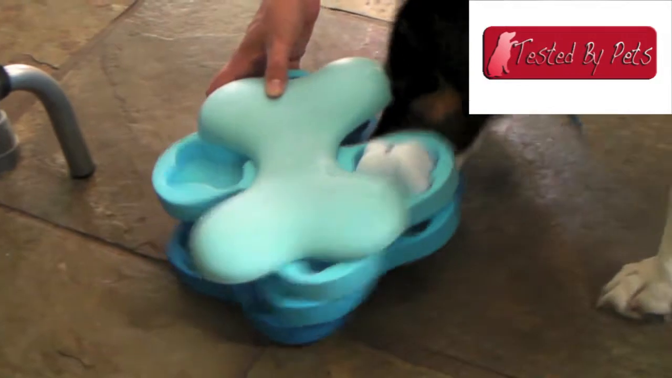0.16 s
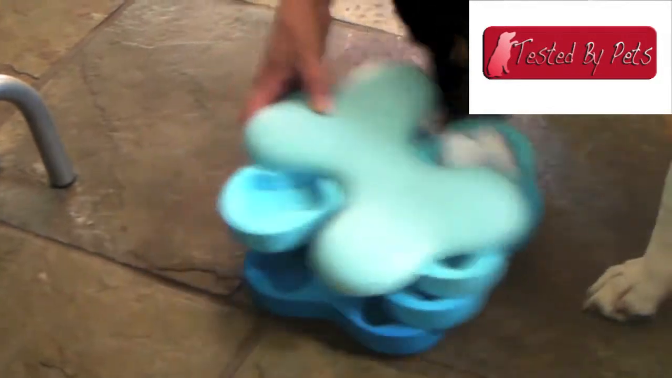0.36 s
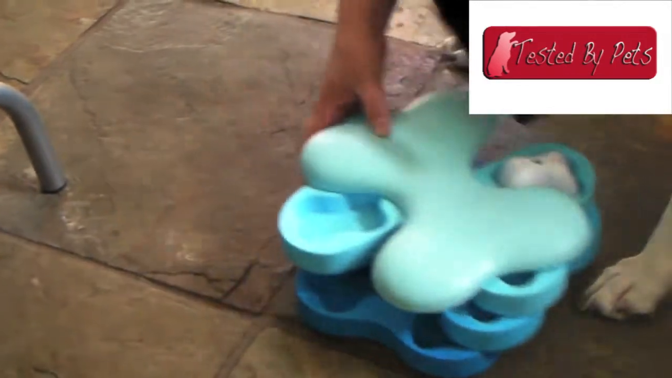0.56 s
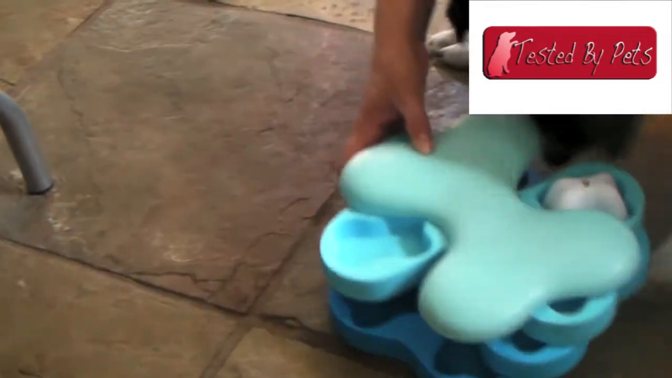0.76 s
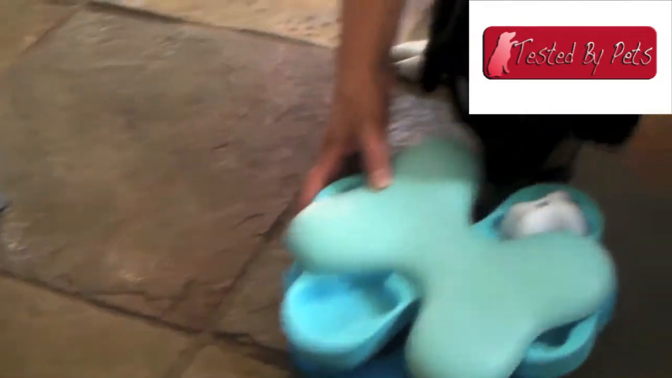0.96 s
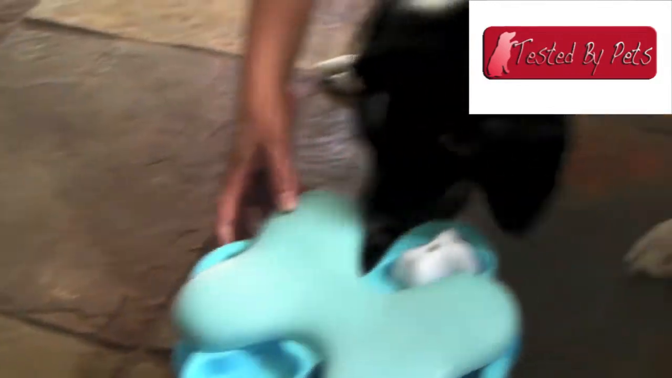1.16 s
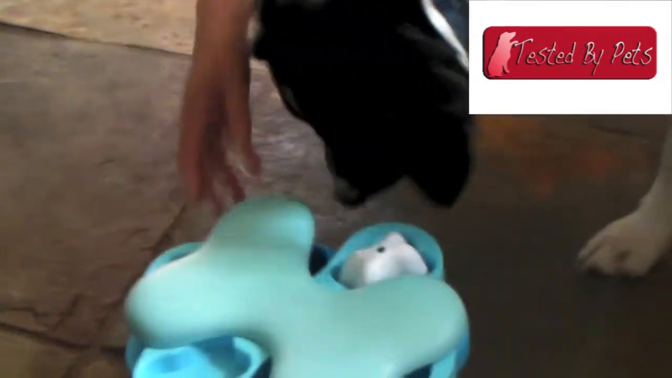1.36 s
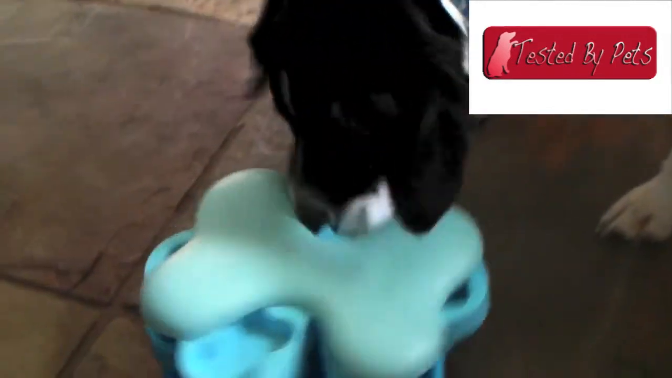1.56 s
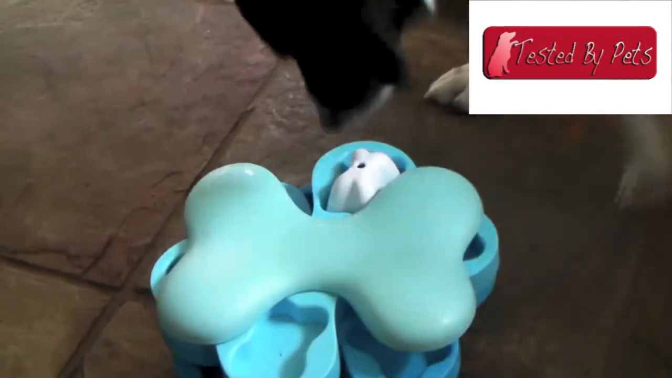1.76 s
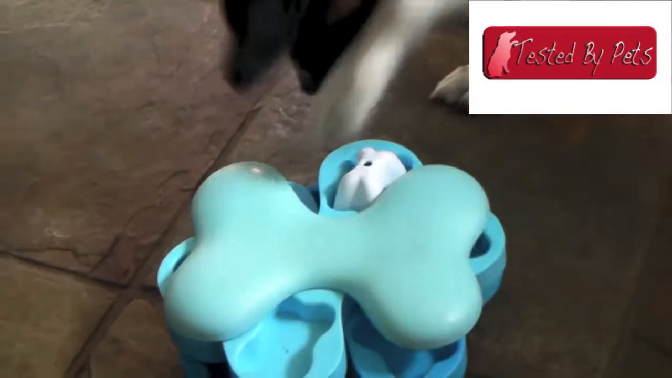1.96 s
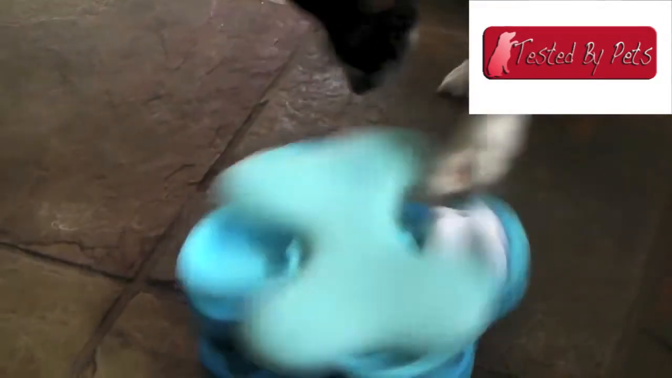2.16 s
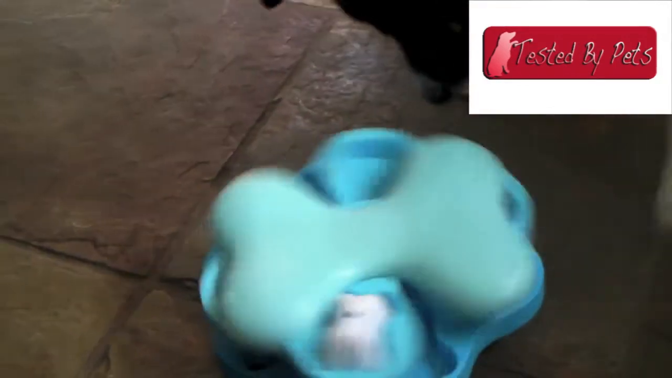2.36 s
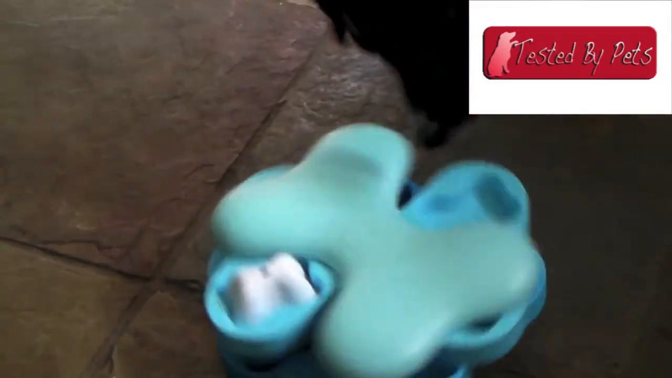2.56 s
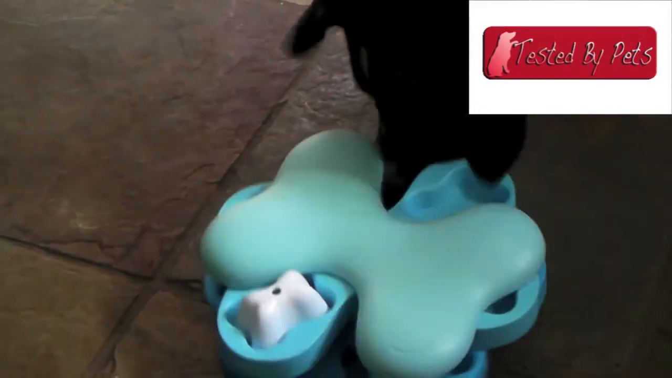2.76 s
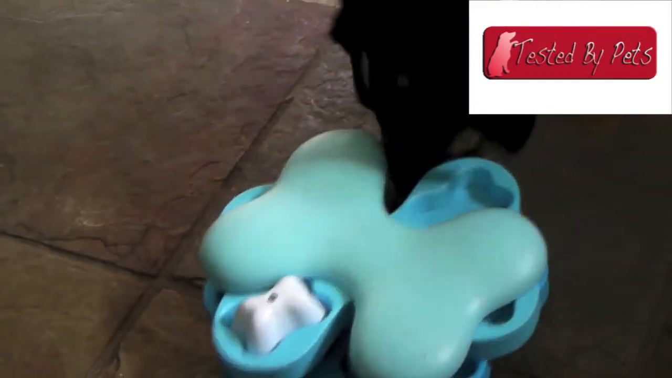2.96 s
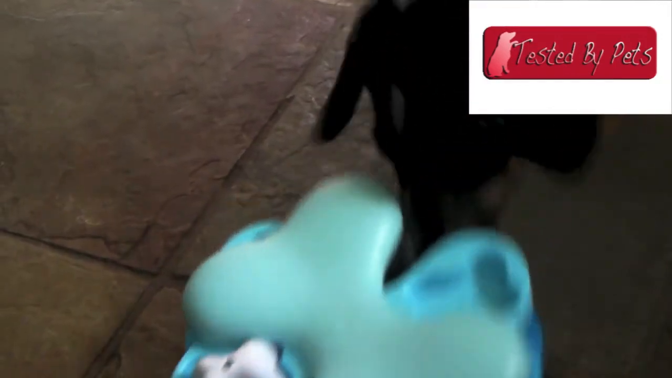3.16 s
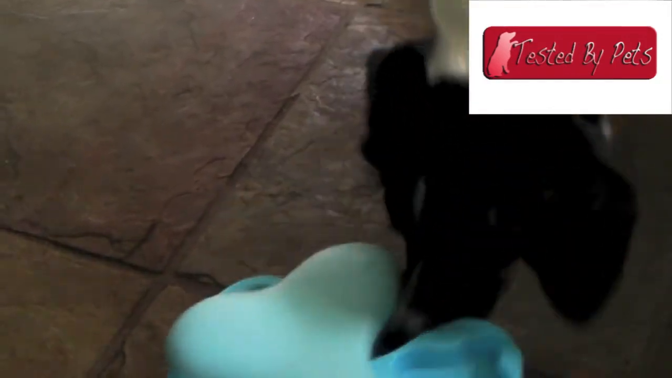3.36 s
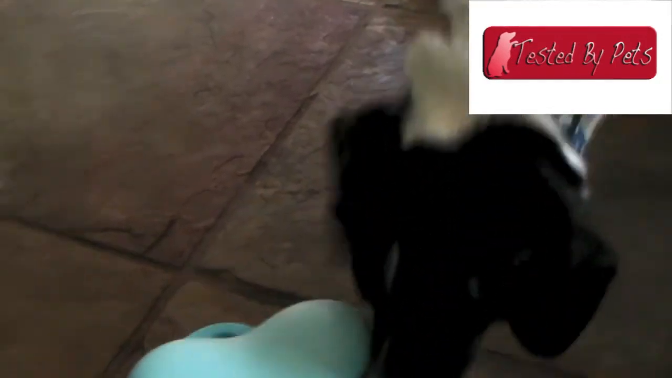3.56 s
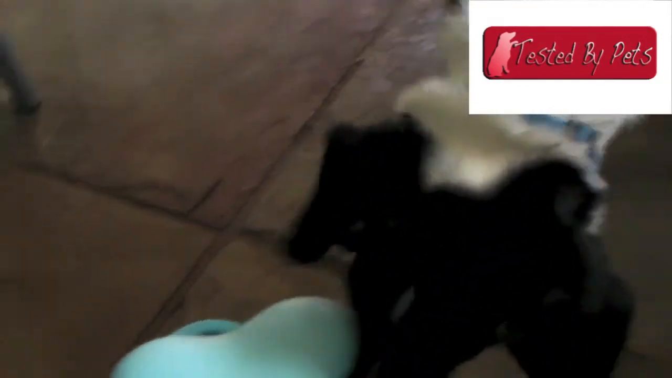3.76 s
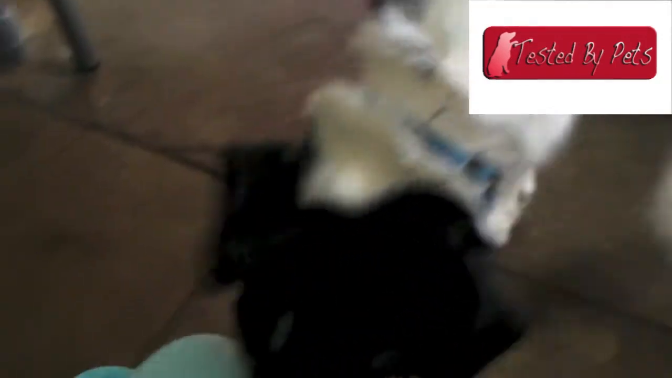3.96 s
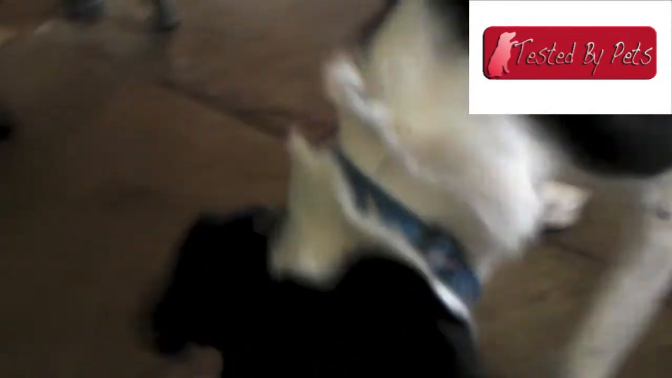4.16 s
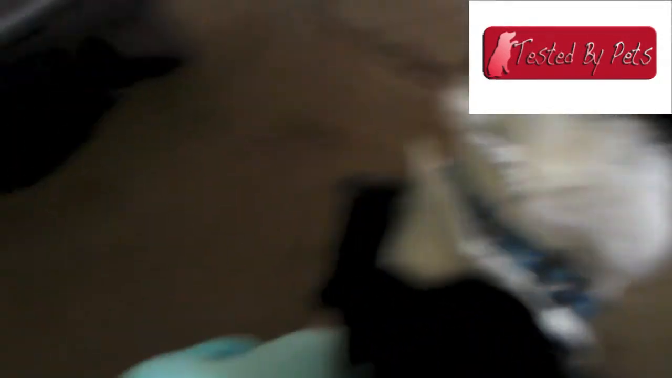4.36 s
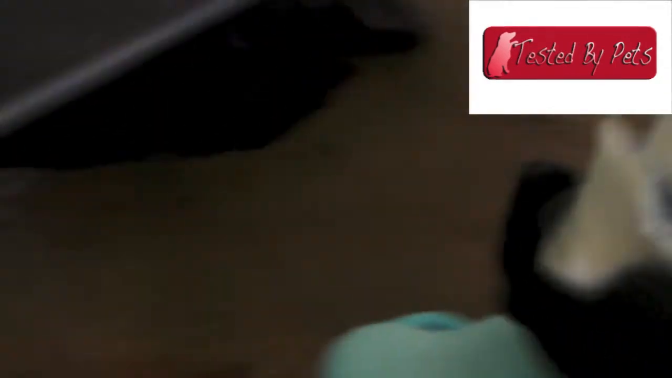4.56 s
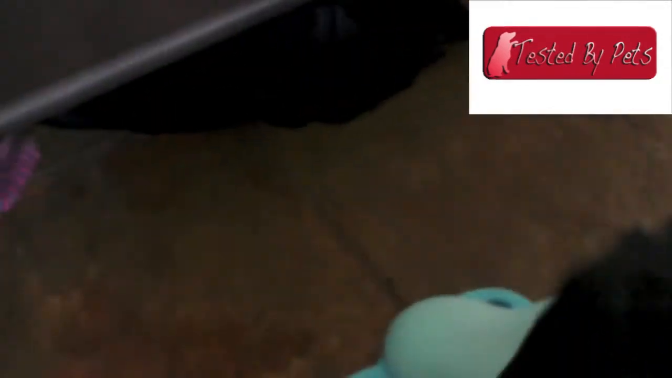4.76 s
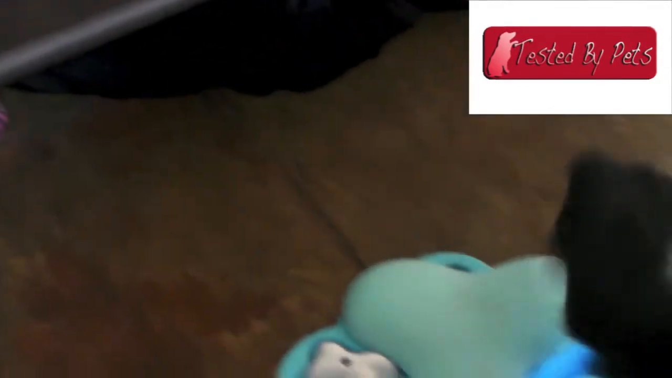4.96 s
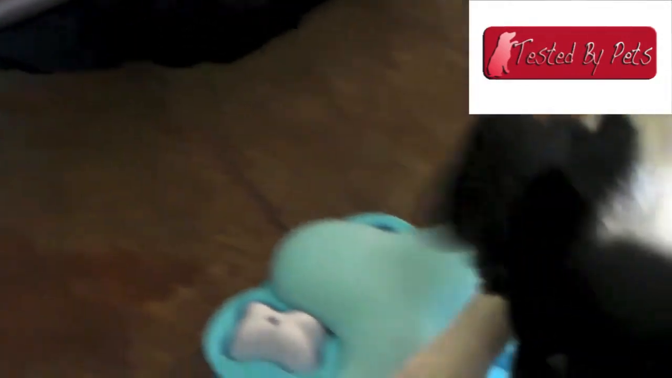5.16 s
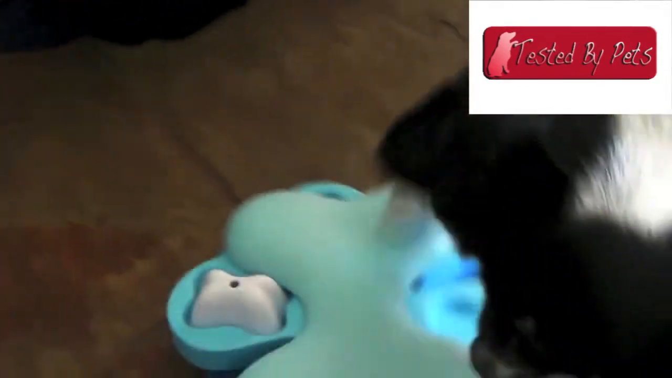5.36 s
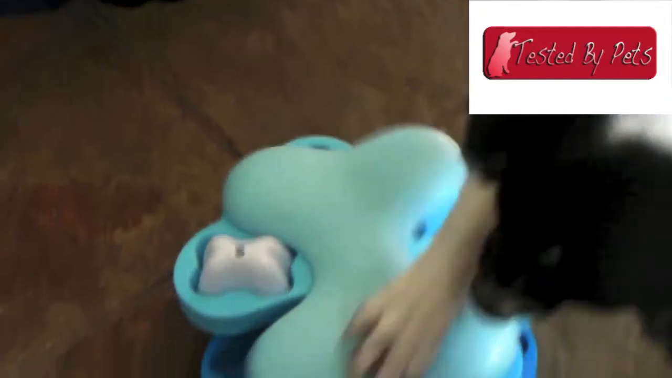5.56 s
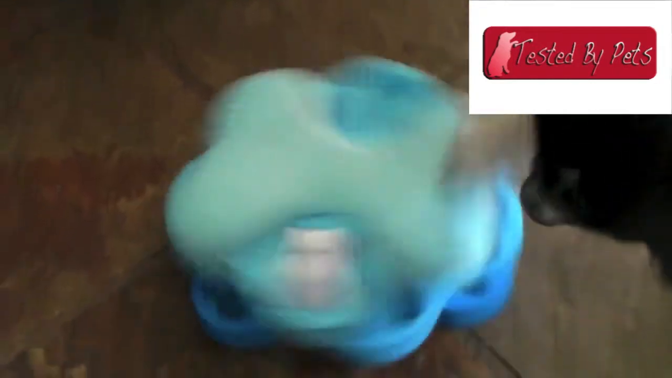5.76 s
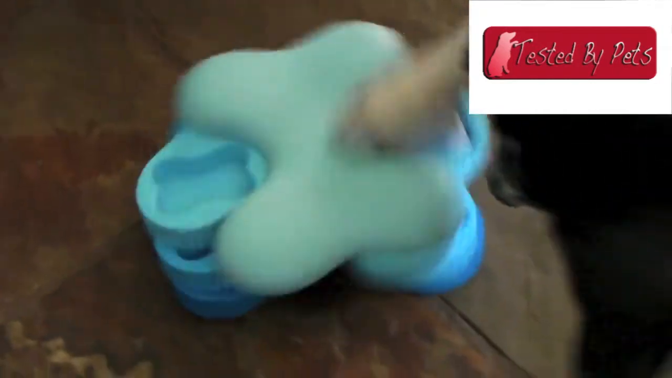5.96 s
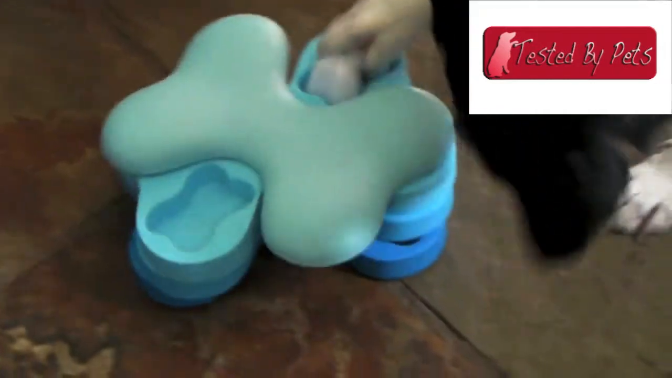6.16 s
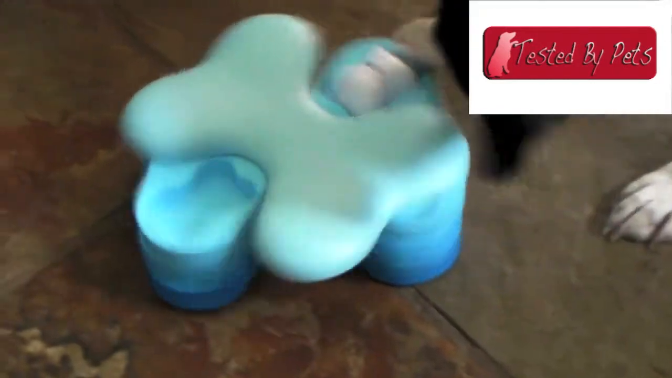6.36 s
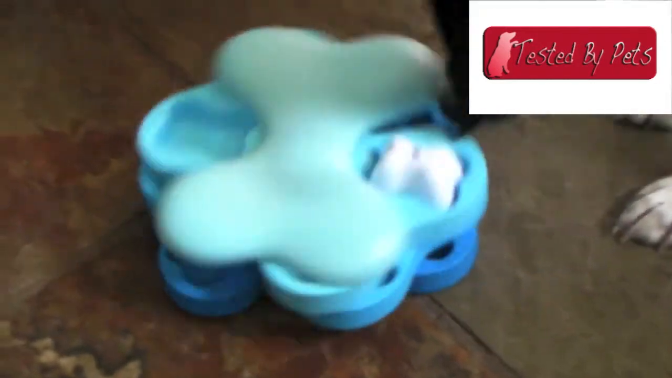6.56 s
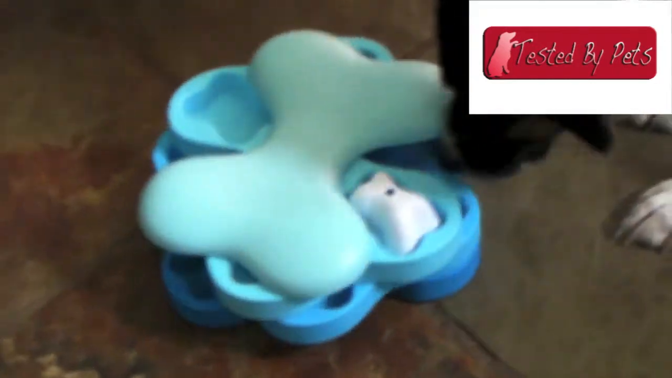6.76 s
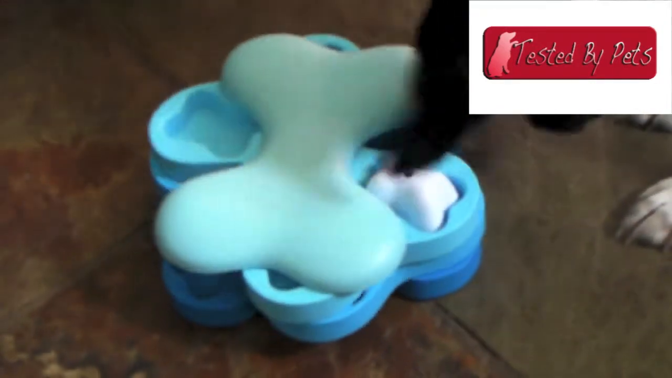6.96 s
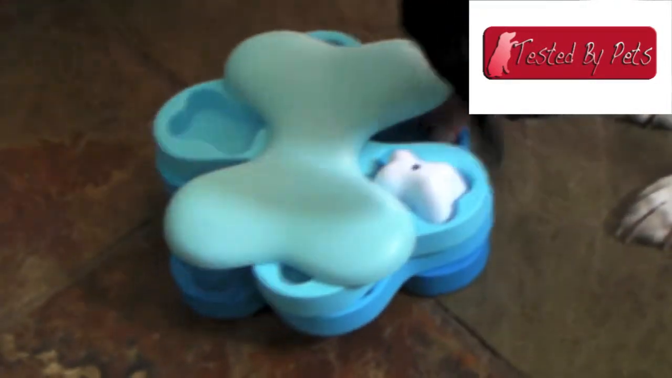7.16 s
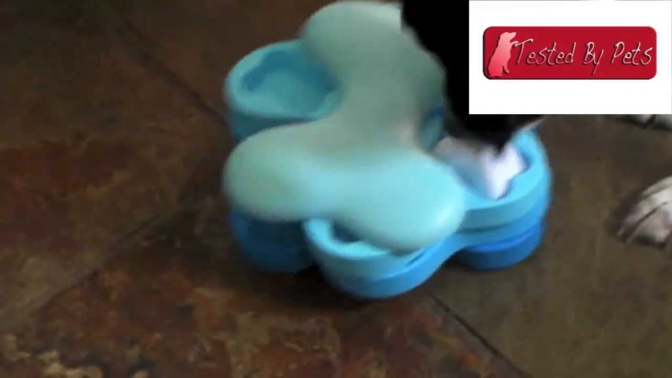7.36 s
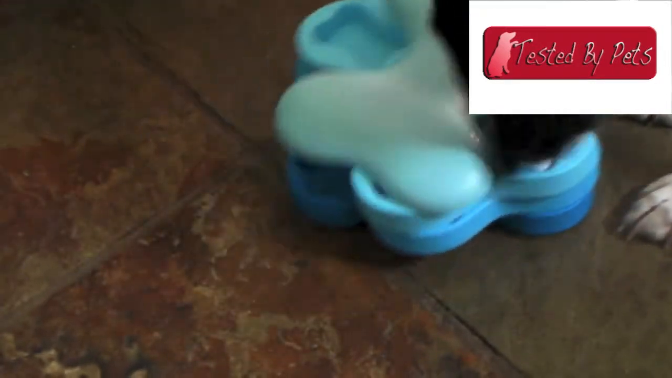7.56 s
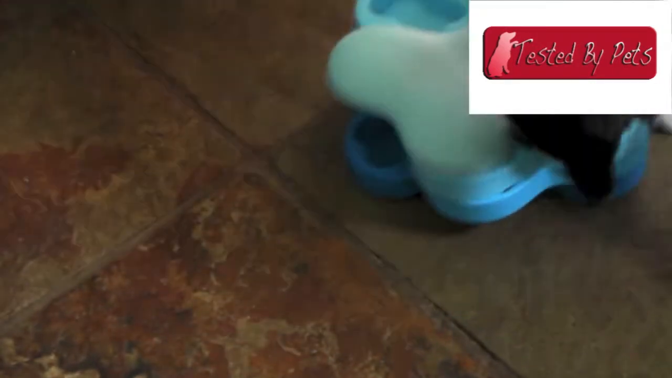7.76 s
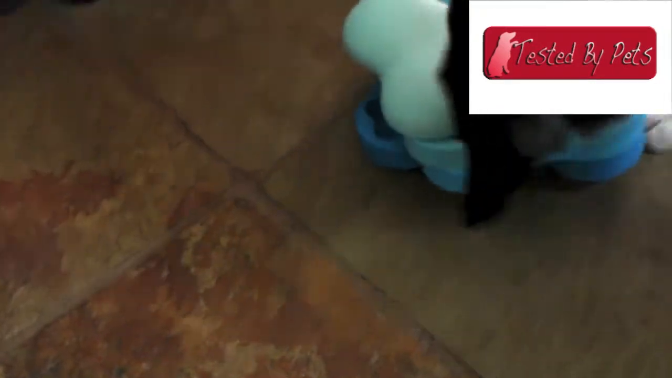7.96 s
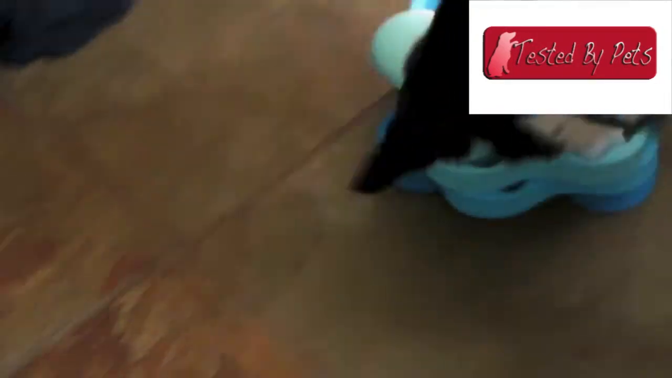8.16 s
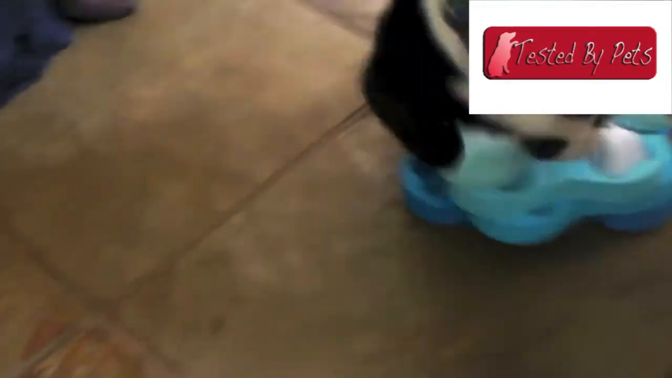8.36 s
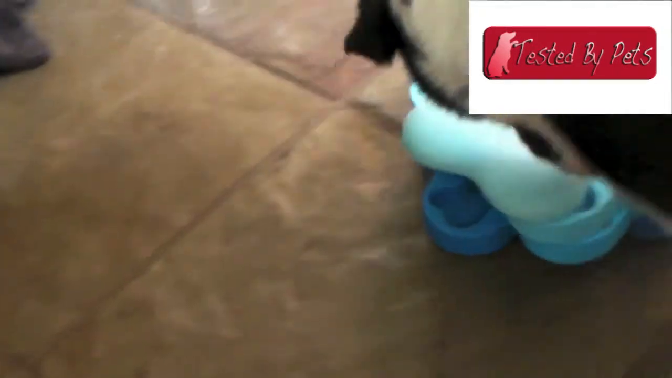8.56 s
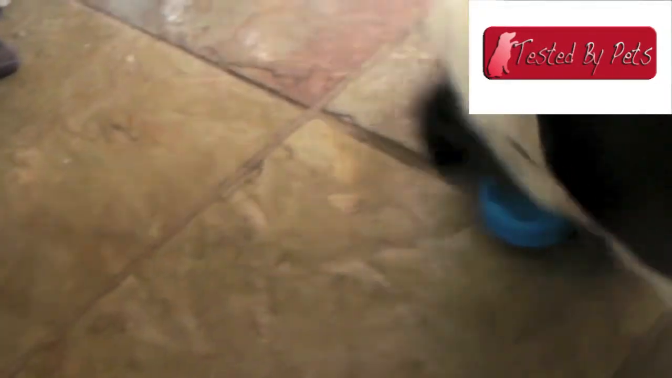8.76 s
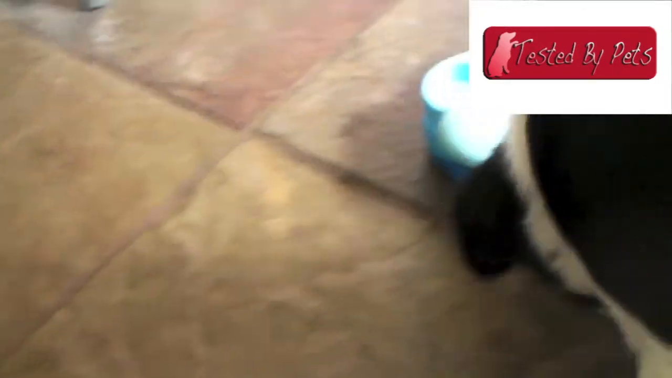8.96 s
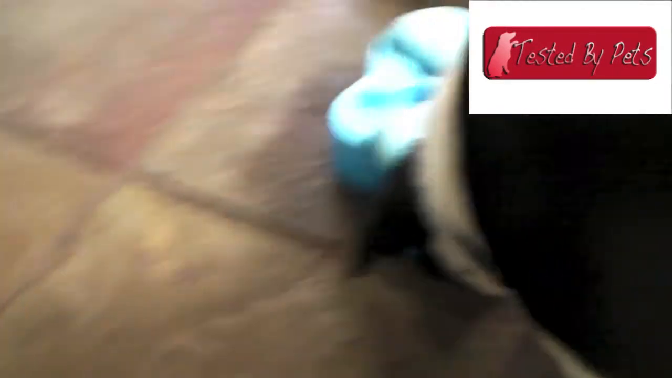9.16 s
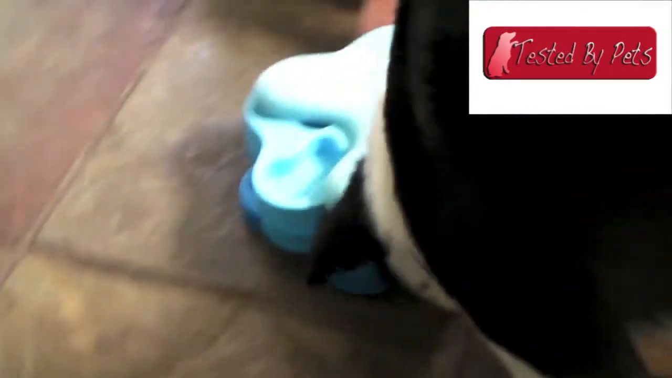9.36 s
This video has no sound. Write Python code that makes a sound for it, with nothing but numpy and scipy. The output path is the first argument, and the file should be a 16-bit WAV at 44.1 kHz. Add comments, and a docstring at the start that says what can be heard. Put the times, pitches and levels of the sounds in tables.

```python
"""A dog noses and paws stacked, hollow plastic trays across a tiled floor, in quiet room air.
First the trays scrape by stick-slip friction and knock together; each impact excites their resonances
and the hard room. The dog shuffles, its metal collar tag rings, and from 2 s tipped trays fall flat
among sharp ticks. Near 4.4 s comes the strongest of a few dull bumps at the microphone, then a swish.
From 5 s claws skid and more trays fall; knocks and scrapes go on until the end, after 9 s."""
import sys
import numpy as np
from scipy import signal
from scipy.fft import rfft, irfft
from scipy.io import wavfile
from scipy.ndimage import uniform_filter1d

SR = 44100
rng = np.random.default_rng(int(sys.argv[2]) if len(sys.argv) > 2 else 0)


def generate_wav(sig):
    """Save sig (samples, or channels by samples) to the path in sys.argv[1] as 16-bit PCM at SR."""
    pcm = np.round(np.clip(np.atleast_2d(sig).T, -1, 1) * 32767).astype(np.int16)
    wavfile.write(sys.argv[1], SR, pcm)


N = 414540

# Levels in the tables are relative; each source applies its own gain.
# shifts of the dog's feet, and a soft swish: t/s, duration/s, level/dB
SHUFFLES = [(0.1, 0.18, -57.5), (0.8, 0.95, -60), (2.1, 0.29, -56.5), (2.83, 1.83, -60.5),
            (6.12, 0.46, -56.5), (6.72, 0.11, -50), (7.25, 2, -60.5)]
SWISH = [(4.57, 0.39, -40.5)]
# dull bumps at the microphone, and snaps of tray edges and claws: t/s, level/dB
BUMPS = [(1.516, -30), (1.751, -33), (4.442, -14), (4.464, -26), (7.336, -29)]
TICKS = [(2.313, -10.5), (2.759, -8.5), (2.813, -14), (3.436, -17), (3.994, -8), (4.022, -11.5),
         (4.064, -20), (4.113, -21), (4.181, -3), (5.349, -5), (5.52, -2.5), (5.778, -12), (6.037, -9)]
# swings of the collar tag: t/s, level/dB, lower modes against upper/dB
JINGLES = [(1.572, -28, -16), (3.11, -35.5, -2), (3.238, -29, -6), (3.6, -46, 3), (4.48, -51, -3),
           (4.785, -34, 3), (5.778, -33.5, 0.5), (5.815, -37, -8), (6.77, -48, -12), (7.755, -46.5, -7)]
# claws skidding on plastic: t/s, duration/s, level/dB
SKIDS = [(5.08, .003, -42), (5.152, 0.015, -27.5), (5.3, 0.036, -31), (5.519, 0.0031, -20.5),
         (5.928, 0.014, -26), (6.029, 0.004, -25), (7.842, 0.019, -35), (8.287, 0.019, -37),
         (8.712, 0.013, -37.5)]
# shoves that slide the trays: t/s, duration/s, hollow-band level/dB, grit as treble gain/dB
PUSHES = [(0.03, 0.25, -51, 5.5), (0.358, 0.079, -31.5, -0.5), (0.684, 0.1, -36.5, 0.5),
          (1.034, 0.21, -39.5, -3.5), (1.55, 0.097, -39, -6), (2.052, 0.2, -38.5, 6),
          (2.644, 0.084, -37.5, -0.5), (3.013, 0.35, -43, 0.5), (3.188, 0.15, -36.5, -1),
          (3.423, 1, -41, -0.5), (3.904, 0.3, -43.5, 4.5), (4.484, 0.11, -48, 3), (5.284, 0.029, -31, 9.5),
          (5.425, 0.055, -34.5, 3), (5.721, 0.11, -34, 1), (5.933, 0.07, -38.5, 4),
          (6.23, 0.044, -40.5, -7), (6.43, 0.11, -43, 4), (7.215, 0.08, -50, 0.5), (7.444, 0.83, -46, -4),
          (8.004, 0.37, -45, -5), (8.35, 0.16, -38.5, 1), (8.453, 0.26, -39.5, -2), (8.82, 0.024, -42, -3),
          (9.024, 0.4, -40, -4.5)]
# tray impacts: t/s, hollow-band energy/dB, hardness as treble gain/dB, hollow resonance f/Hz
KNOCKS = [(0.216, -56, -14.5, 1225), (0.304, -55, -15, 1205), (0.349, -51.5, -4.5, 1260),
          (0.404, -41.5, 0, 1425), (0.968, -57, -10, 1283), (1.226, -50.5, -12.5, 1132),
          (1.245, -51.5, -5, 1490), (1.514, -52, -9, 1145), (1.561, -46.5, -8.5, 2355),
          (1.751, -74, -24, 1200), (2.08, -51.5, -7, 1066), (2.184, -49, -14, 492), (2.76, -51, -2.5, 1120),
          (2.813, -61.5, -1, 1130), (3.205, -50.5, -11, 1680), (3.311, -43, -5.5, 1723),
          (3.566, -49.5, -7.5, 1173), (3.966, -48, -10, 1140), (3.993, -50, -13, 1550),
          (4.16, -43, -18, 2180), (4.18, -42, -6.5, 2084), (5.216, -49.5, -5.5, 975),
          (5.349, -41, -9.5, 1284), (5.389, -54, -21, 1150), (5.426, -52, 1, 910), (5.586, -45, -2.5, 970),
          (5.616, -48.5, -14, 1000), (5.741, -46, 0, 1036), (5.77, -50, -2.5, 940), (5.895, -50, -10, 960),
          (5.986, -54, 6, 910), (6.246, -57, 3.5, 950), (6.388, -48, -5, 935), (6.411, -50, 0, 960),
          (6.463, -45, -6, 1014), (6.499, -48, -26, 530), (6.662, -54, -12, 1205),
          (6.751, -50.5, -8.5, 980), (7.335, -56, -10.5, 1153), (7.443, -45, -6, 1370),
          (7.667, -57, -7.5, 930), (7.715, -54, -9.5, 885), (7.847, -48, -17, 1000),
          (8.127, -53, -7.5, 925), (8.187, -52, -7, 1360), (8.327, -53, -10, 1145),
          (8.467, -55.5, -10, 1500), (8.528, -51, -8, 1190), (8.661, -56, -8.5, 1250),
          (9.039, -58, -6, 916), (9.222, -43.5, -5.5, 1125)]
# falling trays: t/s, edge energy/dB, landing energy/dB, landing hardness/dB, fall time/s, resonance f/Hz
SLAMS = [(2.029, -56.5, -49, -17, 0.0089, 980), (2.205, -55.5, -39, -11.5, 0.012, 1093),
         (2.621, -55.5, -43.5, -7.5, 0.0074, 1287), (5.154, -53.5, -45, -7, 0.012, 1150),
         (5.521, -50, -49, -3, 0.0096, 862), (5.929, -54, -45.5, -11, .019, 887),
         (6.029, -61.5, -43.5, -6, 0.0086, 966)]
# modes of the tag: f/Hz, level/dB, T60/s, share in the lower group (0-1)
TAG_MODES = [(8720, -20, 0.14, 1), (10455, -10, 0.26, 0.9), (11970, -14, 0.27, 0), (13760, -35, 0.15, 0.5),
             (15238, -30, 0.2, 0.5)]
# resonances of the stack: f/Hz, half-width/Hz, level/dB
TRAY_MODES = [(840, 20, -11), (960, 50, -14), (1093, 45, -10), (1560, 80, -12), (3520, 60, -10),
              (4870, 50, -8), (5210, 75, -5)]
# modes of a tray wall: ratio to the hollow resonance, level/dB
WALL_MODES = [(1, -38.5), (1.53, -39), (2.07, -37), (3.1, -38)]
# source spectra: f/Hz, level/dB
AIR_SPECTRUM = [(40, -7), (150, 18), (270, 8), (430, 19.5), (950, 13), (2000, 8.5), (7000, 9), (15800, 1)]
SHUFFLE_SPECTRUM = [(20, -4.5), (120, 4), (270, -2.5), (900, -8), (16000, -66)]
SWISH_SPECTRUM = [(200, -38), (420, -23.5), (4000, -20), (6600, -10.5), (11000, -24), (16000, -30)]
BUMP_SPECTRUM = [(30, 13), (120, 27), (260, 13), (520, 17), (980, 28), (1400, 8), (16000, -40)]
SKID_SPECTRUM = [(3300, -22), (6300, 0), (9500, -5), (16000, -23)]
TICK_SPECTRUM = [(100, -51), (300, -2), (1500, 14.5), (5000, 23.5), (16000, -15)]
SLIDE_SPECTRUM = [(80, -45), (270, -29.5), (390, -5), (900, 2.5), (1400, 7), (1900, 2.5), (2800, 0.5),
                  (4500, -7), (6600, -2), (16000, -26.5)]
KNOCK_SPECTRUM = [(80, -43), (250, -60), (345, -13), (500, -11), (900, -1.5), (1800, -3.5), (2800, 0),
                  (4000, -4), (6800, -4), (16000, -35.5)]
# decay times of the room and of one contact: f/Hz, T60/s
ROOM_DECAY = [(300, 0.28), (1200, 0.43), (4500, 0.36), (13000, 0.18)]
CONTACT_DECAY = [(500, 0.12), (1200, 0.11), (3000, 0.022), (8000, 0.01)]
# coherence of the two channels: f/Hz, correlation
COHERENCE = [(140, 0.55), (700, 0.95), (2000, 1), (4000, 0.67), (7000, 0.21)]
# microphone response, notched near 8 kHz: f/Hz, gain/dB
MICROPHONE = [(6900, 2.5), (7500, -2.5), (7800, -32), (8030, -34), (8350, -11.5), (8750, -0.5), (11200, -2),
              (13800, 8.5)]

HZ = np.fft.rfftfreq(2048, 1 / SR)
TREBLE = np.clip(np.log2((HZ + 1) / 1500) / 1.5, 0, 1)  # shelf: 0 below 1.5 kHz, 1 above 4.2 kHz
HOLLOW_BAND = (HZ > 800) & (HZ < 2200)


def amp(db):
    """Amplitude ratio of a level in decibels."""
    return 10 ** (np.asarray(db) / 20)


def unit(x):
    """Normalisation to unit rms."""
    return x / np.sqrt(np.mean(x ** 2) + 1e-20)


def decay(t, t60):
    """Exponential damping: 60 dB in t60 seconds."""
    return np.exp(-np.log(1000) * t / t60)


def curve(points, hz):
    """Interpolation on a logarithmic frequency axis."""
    f, value = np.transpose(points)
    return np.interp(np.log(hz + 1), np.log(f + 1), value)


def add(mix, s, sound):
    """Superposition: a sound joins the mix at time s."""
    part = mix[:, max(round(s * SR), 0):][:, :sound.shape[1]]
    part += sound[:, :part.shape[1]]


def colour(x, curve_db):
    """Minimum-phase filtering with the given gain at each frequency of HZ."""
    log_gain = np.log(amp(np.r_[curve_db, curve_db[-2:0:-1]]))
    taps = np.fft.ifft(np.exp(np.conj(signal.hilbert(log_gain)))).real
    return signal.oaconvolve(x, taps[None], axes=1)[:, :x.shape[1]]


def tone(points, band=HZ >= 0, peaks_db=0):
    """Power normalisation: a gain curve in dB, peaks included, giving white noise unit power in band."""
    curve_db = curve(points, HZ) + peaks_db
    return curve_db - 10 * np.log10(np.mean(amp(curve_db) ** 2 * band))


def stereo(noise):
    """Partial coherence: two close microphone ports agree in the midrange and little in the treble."""
    size = noise.shape[1]
    a, b = rfft(noise)
    correlation = np.clip(curve(COHERENCE, np.fft.rfftfreq(size, 1 / SR)), -1, 1)
    mid, side = a * np.sqrt((1 + correlation) / 2), b * np.sqrt((1 - correlation) / 2)
    return irfft(np.array([mid + side, mid - side]), size)


def burst(decays, size):
    """Frequency-dependent damping: white noise of about unit energy dies away band by band."""
    t, hz = np.arange(size) / SR, np.fft.rfftfreq(size, 1 / SR)
    spectrum = rfft(stereo(rng.choice([-1., 1.], (2, size))))
    out = 0
    for weights, (_, t60) in zip(np.eye(len(decays)), decays):
        band = curve(np.c_[np.array(decays)[:, 0], weights], hz)
        fade = decay(t, t60)
        out = out + irfft(spectrum * band, size) * fade / np.linalg.norm(fade)
    return out


def strokes(rows, attack_s, release_s, sag_db_per_s=0):
    """Incoherent addition: the envelopes of movements that rise, hold or sag, and fade sum in power."""
    power = np.zeros((1, N))
    for start, length, db in rows:
        t = np.arange(-min(attack_s, start), length + 10 * release_s, 1 / SR)
        rise = np.sin(np.pi / 4 * (1 + np.minimum(t / attack_s, 1))) ** 2
        fall = np.exp(-np.maximum(t - length, 0) / release_s)
        gain = amp(db - sag_db_per_s * t) * rise * fall
        add(power, start + t[0], gain[None] ** 2)
    return np.sqrt(power[0] + 1e-12)


def hiss(spectrum, level_db):
    """Spectral shaping of Gaussian stereo noise."""
    return colour(stereo(rng.standard_normal((2, N))) * amp(level_db), tone(spectrum))


def background(air_db=-59, shuffle_db=-2, thuds_per_s=140, attack_s=0.034, release_s=0.045):
    """Amplitude-modulated noise: feet shuffle in soft thuds, and one swish passes, over steady air."""
    thuds = amp(3.3 * np.minimum(rng.exponential(1, N), 3)) * (rng.random(N) < thuds_per_s / SR)
    lumps = unit(abs(signal.oaconvolve(thuds, signal.windows.hann(SR // 60), "same")))
    feet_db = shuffle_db + 20 * np.log10(strokes(SHUFFLES, attack_s, release_s) * (lumps + 0.093))
    swish_db = 20 * np.log10(strokes(SWISH, attack_s, release_s, sag_db_per_s=12.5))
    return hiss(AIR_SPECTRUM, air_db) + hiss(SHUFFLE_SPECTRUM, feet_db) + hiss(SWISH_SPECTRUM, swish_db)


def in_room(x, wet_db, delay_s=0.0026):
    """Reverberation: tile and walls add a diffuse tail, different for each place on the floor."""
    tail = np.pad(burst(ROOM_DECAY, size=24000), ((0, 0), (round(delay_s * SR), 0)))
    out = amp(wet_db) * signal.fftconvolve(x[:1], tail, axes=1)
    add(out, 0, x)
    return out


def bumps(level_db=11):
    """Direct transmission: dull impulses reach the microphone without reverberation."""
    out = np.zeros((2, N))
    for s, db in BUMPS:
        add(out, s, np.full((2, 1), amp(level_db + db)))
    return colour(out, tone(BUMP_SPECTRUM))


def collar_tag(level_db=8, wet_db=-1, bounces=5, rattle_s=.012, bounce_db=-4, clink_db=6, clink_s=.0018):
    """Modal vibration: a metal disc rebounds against its ring, each bounce exciting its modes less."""
    out, t = np.zeros((2, N)), np.arange(SR // 2) / SR
    clink = amp(clink_db) * np.exp(-t / clink_s)
    for s, db, lower_db in JINGLES:
        ring = np.zeros((2, len(t)))
        for bounce in range(bounces):
            delay = bounce * rattle_s * (1 + rng.random())
            for hz, mode_db, t60, share in TAG_MODES:
                detuned_hz = hz * (1 + .002 * rng.standard_normal())
                cycles = detuned_hz * t + rng.random((2, 1))
                gain = amp(mode_db + share * lower_db + bounce * bounce_db)
                add(ring, delay, gain * (decay(t, t60) + clink) * np.sin(2 * np.pi * cycles))
        add(out, s, amp(level_db + db) * in_room(ring, wet_db))
    return out


def claw_skids(wet_db=-6):
    """Friction noise: claws crossing smooth plastic make a dense spray of tiny catches."""
    catches = stereo(rng.standard_normal((2, N)) * rng.exponential(1, N))
    spray = unit(catches) * strokes(SKIDS, attack_s=0.0079, release_s=0.016)
    return colour(in_room(spray, wet_db)[:, :N], tone(SKID_SPECTRUM))


def ticks(level_db=10, wet_db=-4, t60=.008):
    """Brief contacts have broad spectra: tray edges and claws snap brightly."""
    out = np.zeros((2, N))
    for s, db in TICKS:
        add(out, s, amp(level_db + db) * in_room(burst([(5000, t60)], size=2048), wet_db))
    return colour(out, tone(TICK_SPECTRUM))


def contact(rise_s=0.00018):
    """High modal density: a hard touch excites countless short plastic modes, a spectrally even crack."""
    onset = 1 - np.exp(-np.arange(4096) / SR / rise_s)
    spectrum = rfft(burst(CONTACT_DECAY, size=4096) * onset)
    power = uniform_filter1d((abs(spectrum) ** 2).mean(0), size=40)
    return irfft(spectrum / np.sqrt(power))


def clack(wet_db, build_s=0.0025):
    """Direct and diffuse sound: the room's field builds up behind one contact."""
    build_up = 1 - np.exp(-np.arange(20000) / SR / build_s)
    out = amp(wet_db) * burst(ROOM_DECAY, size=20000) * build_up
    add(out, 0, contact())
    return out


def spot_db(depth_db=2.1):
    """Modal coupling varies with the spot struck: random peaks and dips, shallower in the treble."""
    ripple = unit(uniform_filter1d(rng.standard_normal(200), size=3))  # ten points to the octave
    return depth_db * (1 - TREBLE / 2) * np.interp(10 * np.log2(HZ + 1), np.arange(len(ripple)), ripple)


def hollow_db(hz, ring_db, half_width_hz=180):
    """Resonance: the hollow of the loaded tray reinforces the band around its natural frequency."""
    return 20 * np.log10(abs(1 + amp(ring_db) / (1 + 2j * (HZ - hz) / half_width_hz)))


def tray_resonances(x):
    """Forced vibration: the trays impose the same resonances on whatever shakes them."""
    response = 1 + sum(amp(db) / (1 + 2j * (HZ - hz) / width) for hz, width, db in TRAY_MODES)
    return colour(x, 20 * np.log10(abs(response)))


def push_effort():
    """Friction noise follows the drive: the envelope of the shoves, and their treble gain in dB."""
    shape = dict(attack_s=0.093, release_s=0.11, sag_db_per_s=11.5)
    effort = strokes([(s, length, db) for s, length, db, _ in PUSHES], **shape)
    treble = strokes([(s, length, db + grit) for s, length, db, grit in PUSHES], **shape)
    return effort, 20 * np.log10(treble / effort)


def grip(depth_db=2.7, grab_s=.018):
    """Fluctuating friction: a rim grabs and lets go, breaking each shove into small scrapes."""
    return amp(depth_db * unit(uniform_filter1d(rng.standard_normal(N), size=round(grab_s * SR))))


def sliding(level_db=-1.5, wet_db=0.0, slips_per_s=380, spread_db=4, rub_gain=.3):
    """Stick-slip friction: rims on tile give a train of uneven impulses over a fine rub."""
    effort, grit_db = push_effort()
    sizes = amp(spread_db * np.minimum(rng.exponential(1, N), 3.5)) * rng.choice([-1, 1], N)
    slips = unit(sizes * (rng.random(N) < slips_per_s / SR))
    rub = rub_gain * rng.standard_normal(N)
    drive = unit((slips + rub) * grip()) * effort
    knock_s, _, _, knock_hz = np.transpose(KNOCKS)  # the tray being knocked is the one that slides
    out, stretch = np.zeros((2, N)), SR // 12
    for start in range(0, N, stretch):  # as the stack rocks, the load passes from spot to spot
        treble_db = grit_db[start:start + stretch].mean() * TREBLE
        peaks_db = hollow_db(np.interp(start / SR, knock_s, knock_hz), ring_db=-10) + spot_db()
        response = colour(clack(wet_db), tone(SLIDE_SPECTRUM, HOLLOW_BAND, peaks_db) + treble_db)
        add(out, start / SR, signal.fftconvolve(drive[None, start:start + stretch], response, axes=1))
    return amp(level_db) * out


def wall_ring(hz, t60=.06):
    """Free vibration: a struck tray wall rings briefly in a few inharmonic modes."""
    t = np.arange(SR // 8) / SR
    modes = sum(amp(db) * np.sin(2 * np.pi * hz * ratio * t) for ratio, db in WALL_MODES)
    return np.tile(modes * decay(t, t60), (2, 1))


def slams(edge_hard_db=7.5):
    """Double impact: a tipped tray gives a thin, hard knock with its edge, then a fuller one landing."""
    edges = [(s, edge_db, edge_hard_db, hz) for s, edge_db, _, _, _, hz in SLAMS]
    landings = [(s + fall_s, db, hard_db, hz) for s, _, db, hard_db, fall_s, hz in SLAMS]
    return edges + landings


def knocks(level_db=-3.0, wet_db=4.5, chatter_db=-11, chatter_s=.026, graze_db=-19, graze_s=0.0073):
    """Impact and rebound: rims graze, meet with a crack that rings the wall, and chatter to rest."""
    out = np.zeros((2, N))
    for s, energy_db, hard_db, hz in KNOCKS + slams():
        blow = np.pad(amp(graze_db) * contact(), ((0, 0), (0, SR // 2)))
        add(blow, graze_s, clack(wet_db))
        add(blow, graze_s, wall_ring(hz))
        for delay in rng.uniform(.2, 1, size=3) * chatter_s:
            add(blow, graze_s + delay, amp(chatter_db) * contact())
        ring_db = -1 - 0.25 * max(hard_db, -16)  # dull, flat blows excite the hollow more than hard ones
        peaks_db = hollow_db(hz, ring_db) + spot_db()
        spectrum_db = tone(KNOCK_SPECTRUM, HOLLOW_BAND, peaks_db) + hard_db * TREBLE
        add(out, s - graze_s, amp(level_db + energy_db) * np.sqrt(SR) * colour(blow, spectrum_db))
    return out


def scene(balance_db=.5):
    """Superposition of all sources; a level difference between channels sets them slightly left."""
    skids = claw_skids()
    trays = tray_resonances(knocks() + sliding())
    mix = trays + ticks() + skids + collar_tag() + bumps() + background()
    return mix * amp([[balance_db], [-balance_db]])


def record(dry):
    """Transduction: microphone response, soft saturation of the sharpest snaps, then a band limit."""
    ceiling, cutoff_hz = .8, 16100
    heard = colour(dry, curve(MICROPHONE, HZ))
    saturated = heard / (1 + (heard / ceiling) ** 4) ** (1 / 4)
    low_pass = signal.firwin(511, cutoff_hz, window=("kaiser", 9), fs=SR)
    return signal.oaconvolve(saturated, low_pass[None], "same")


dry = scene()
out = record(dry)
generate_wav(out)
```